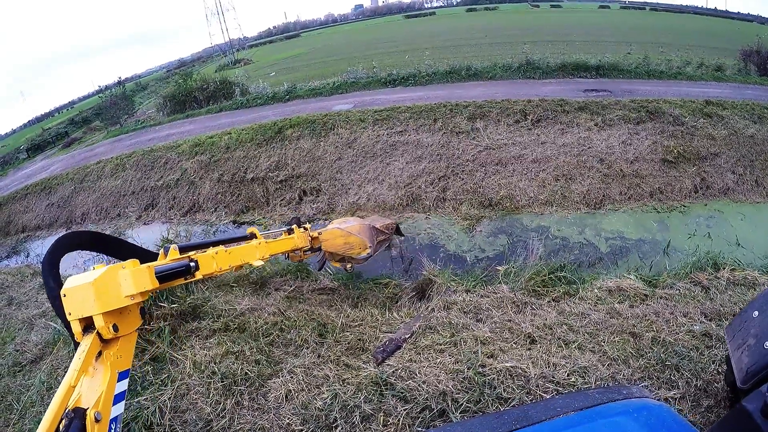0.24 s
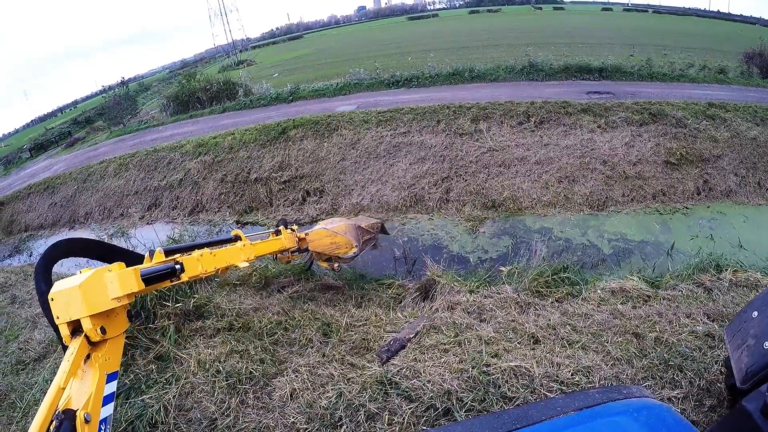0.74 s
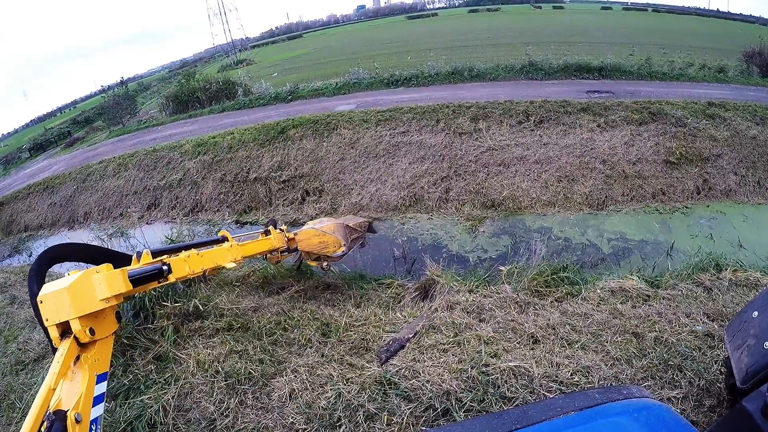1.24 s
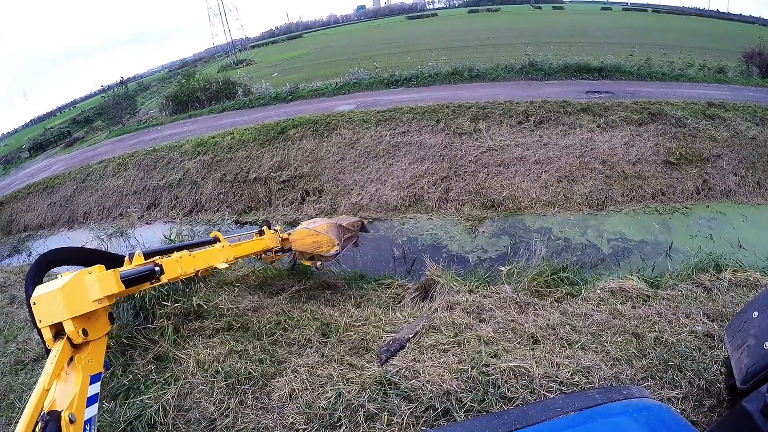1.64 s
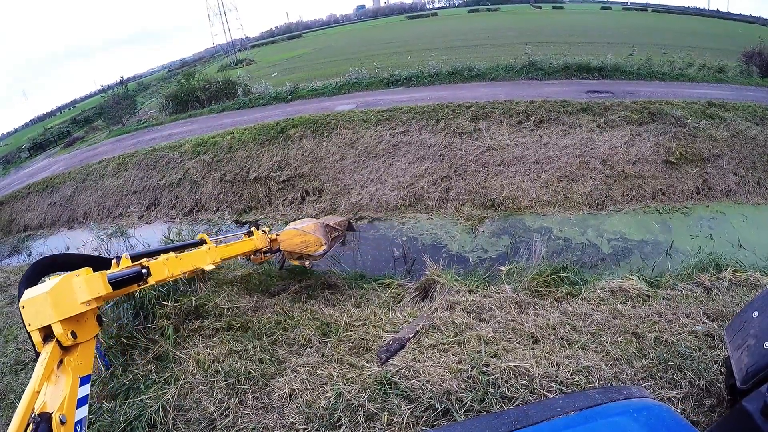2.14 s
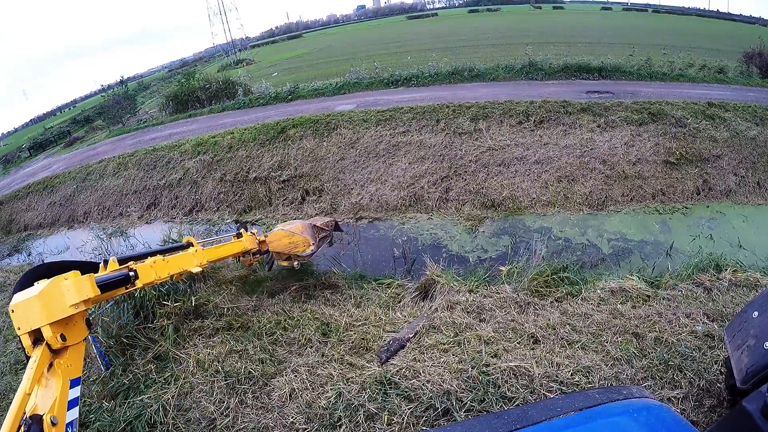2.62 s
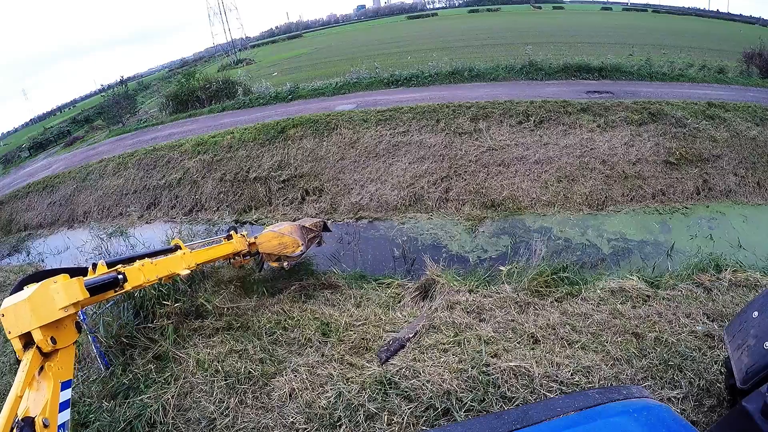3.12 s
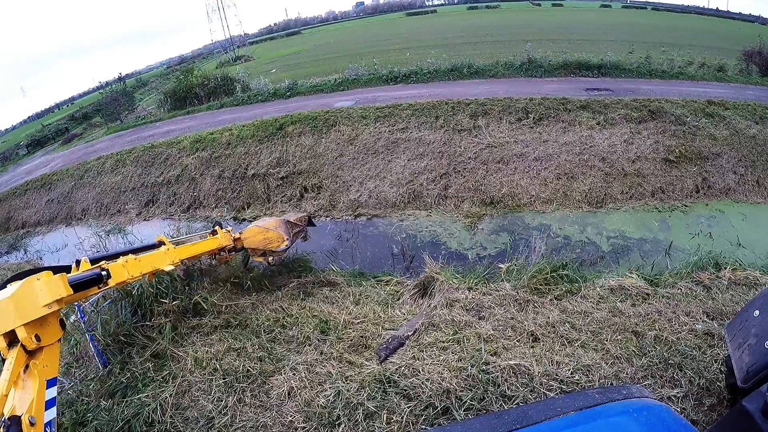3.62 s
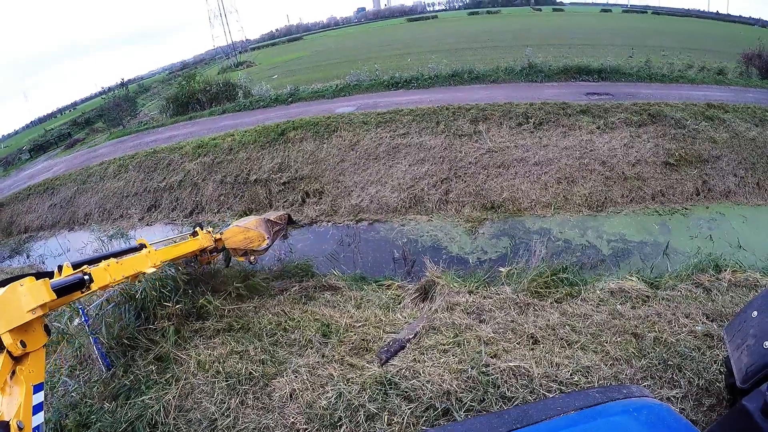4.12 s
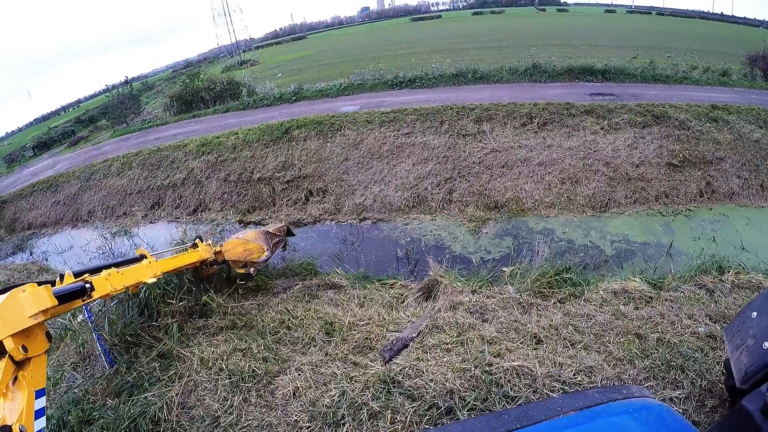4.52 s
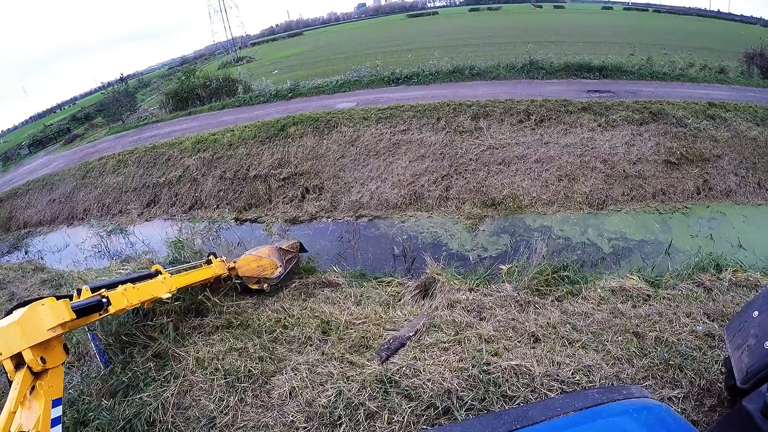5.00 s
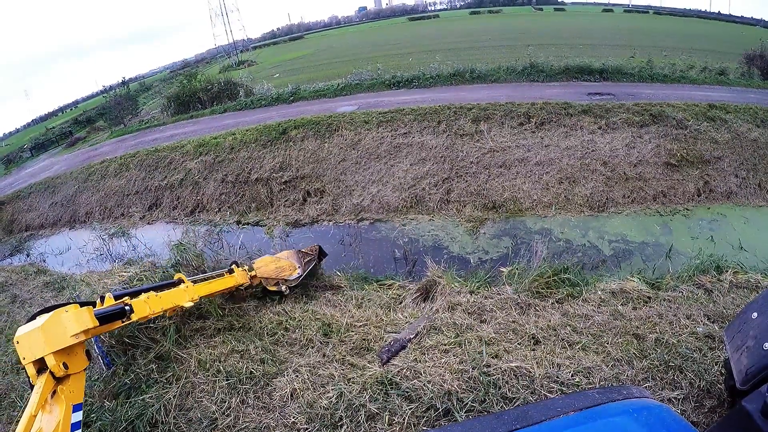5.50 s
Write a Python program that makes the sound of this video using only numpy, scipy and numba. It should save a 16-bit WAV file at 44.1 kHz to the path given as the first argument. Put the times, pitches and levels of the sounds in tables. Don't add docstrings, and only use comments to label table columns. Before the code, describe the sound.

A diesel tractor drones steadily with a deep cab boom and thin whine while flails thrash dry stems, then hiss and splatter through wet growth.

```python
import sys
import numpy as np
from scipy import signal
from scipy.fft import rfft, irfft
from scipy.io import wavfile
from scipy.ndimage import uniform_filter1d
from numba import njit

SR = 44100
rng = np.random.default_rng(int(sys.argv[2]) if len(sys.argv) > 2 else 0)


def level_to_linear(level):
    exponent = np.asarray(level, float) / 20
    return 10 ** exponent


def dump(signal):
    limited = np.clip(np.atleast_2d(signal).T, -1, 1)
    pcm = np.round(limited * 32767).astype(np.int16)
    wavfile.write(sys.argv[1], SR, pcm)


N = 253575


def curve(table):
    s, *columns = np.transpose(table)
    return [np.interp(np.arange(N) / SR, s, c) for c in columns]


def bump(s, span):
    return np.exp(-((np.arange(N) / SR - s) / span) ** 2)


def unit(x):
    return x / np.sqrt(np.mean(x ** 2))


def hiss():
    return rng.standard_normal(N)


@njit
def svf(x, hz, width):
    y, b, l = np.empty(len(x)), 0., 0.
    g, k = np.tan(np.pi * hz / SR), width / hz
    for i in range(len(x)):
        v = (b + g * (x[i] - l)) / (1 + g * (g + k))
        b, l, y[i] = 2 * v - b, l + 2 * g * v, k * v
    return y


def ring(x, hz, width_hz):
    once = svf(x, float(hz), float(width_hz))
    return svf(once, float(hz), float(width_hz))


def walk(rate):
    hold = int(SR / rate)
    steps = np.repeat(rng.standard_normal(N // hold + 1), hold)
    return unit(uniform_filter1d(uniform_filter1d(steps, hold), hold)[:N])


def colour(x, points):
    hz, db = np.transpose(points)
    f = np.maximum(np.arange(len(x) // 2 + 1) * SR / len(x), 1)
    gain = level_to_linear(np.interp(np.log(f), np.log(hz), db))
    return unit(irfft(rfft(x) * gain, len(x)))


def grains(rate, spread_db):
    noise, when, big = hiss(), rng.random(N), rng.exponential(size=N)
    return unit(noise * (when < rate / SR) * level_to_linear(spread_db * big))


def tone(hz):
    return np.sqrt(2) * np.sin(2 * np.pi * (np.cumsum(hz) / SR + rng.random()))


def die_away(t, rise_s, t60_s):
    return np.minimum(t / rise_s, 1) * np.exp(-np.log(1000) * t / t60_s)


def engine_speed():
    return 12.972 * (1 + 0.001023 * walk(3))


# t/s, level/dB
BOOM = [(0, -14.5), (.4, -14), (1, -16.5), (1.55, -15.5), (2.2, -16.5), (3.3, -17), (3.75, -18.5),
        (4.27, -18), (4.9, -16), (5.05, -17.5), (5.4, -18), (5.63, -14.5), (5.75, -19)]
# t/s, boom loss/dB, lasting/s, sway level/dB
JOLTS = [(.13, 2.5, 0.12, -52), (.49, 1, 0.034, -37), (.7, 5, 0.067, -44), (1.0, 1.5, .05, -48),
         (1.69, 4.5, 0.03, -46.5), (2.42, 3.5, 0.036, -42), (2.6, 2.5, 0.028, -55), (3.58, 3.5, 0.036, -42),
         (3.88, 6, 0.077, -39), (4.04, 4, 0.13, -46), (4.36, 5, 0.023, -42), (4.5, 8.5, 0.067, -33),
         (4.7, 4, 0.091, -27), (5.135, 11.5, 0.045, -47), (5.22, 18, 0.031, -42), (5.295, 21, 0.038, -40)]


def boom(speed):
    cycle = 2 * np.pi * np.cumsum(speed) / SR
    swell = 1 + .04 * np.sin(cycle + 1.1)
    hurry = .07 * np.sin(cycle) + .1 * walk(6)
    loss_db = sum(loss * bump(s, span) for s, loss, span, _ in JOLTS)
    level_db = curve(BOOM)[0] - loss_db + 0.74 * walk(24.94)
    return level_to_linear(level_db) * np.sqrt(2) * swell * np.cos(8 * cycle + hurry)


def locked_tone(speed, order, level_db):
    return level_to_linear(level_db + 1.4 * walk(8)) * tone(order * speed * (1 + 0.001597 * walk(20)))


ORDERS = (4, 16, 25, 30, 40, 50, 60, 84, 90, 125, 131.5, 188, 220, 237.5, 250)
ORDERS_DB = (-41, -54, -47, -56, -55.5, -55.5, -56, -59, -61, -55.5, -67, -52, -55.5, -52, -55)


def gears(speed):
    return sum(locked_tone(speed, order, db) for order, db in zip(ORDERS, ORDERS_DB))


PUMP_ORDERS = (95, 100, 120, 150)
# level/dB rms, swell/dB, loudest at t/s, lasting/s
PUMP = [
    (-52.5, 5, 0.96, .8),
    (-52, 6.5, 4.5, 0.49),
    (-51, 4, 2.1, 0.87),
    (-54, 6.5, 4.4, 0.84),
]


def pump(speed):
    out = np.zeros(N)
    for order, (db, swell_db, s, span) in zip(PUMP_ORDERS, PUMP):
        out += locked_tone(speed, order, db + swell_db * bump(s, span) + 0.62 * walk(2))
    return out


# f/Hz, flutter/Hz
BELTS_AND_HOOD = [(269, 4), (467, 4), (572, 2.5), (1830, 22)]
# level/dB rms, gain/dB per s, beat depth/dB, beats per s, strongest at t/s
BELT_AND_HOOD_BEATS = [(-43.5, -0.6, 3.5, .4, 0.47), (-44.5, 0.67, 1, 0.95, 1.6), (-44, -0.2, 0, .55, 2.3),
                       (-49, 0, 3, .7, 0.15)]


def belts_and_hood():
    t = np.arange(N) / SR
    slips_per_s = (0, 0, -.0015, 0)
    out = np.zeros(N)
    for (hz, flutter), (db, gain_db, beat_db, rate, s), slip in zip(BELTS_AND_HOOD, BELT_AND_HOOD_BEATS, slips_per_s):
        level_db = db + gain_db * t + beat_db * np.cos(2 * np.pi * rate * (t - s))
        pitch = hz * (1 + slip * t) + flutter * walk(25)
        out += level_to_linear(level_db - 2.0 + 0.62 * walk(12)) * tone(pitch)
    return out


# f/Hz, width/Hz, level/dB rms
PANELS = [(24, 12, -50), (44, 13, -45), (52.8, 15, -44), (138.2, 23, -45), (224.6, 7.1, -55),
          (273, 18, -52.5), (411.3, 11.5, -51.5), (464, 30, -51), (529.6, 10, -48.5), (567, 27, -59.5),
          (709, 29, -51.5)]


def panels():
    return sum(level_to_linear(db) * unit(ring(hiss(), hz, width)) for hz, width, db in PANELS)


# f/Hz, level/dB per Hz
RUMBLE = [(12, -30), (30, -23), (70, -3), (110, -0.5), (170, -5.5), (260, -3.5), (360, -11), (480, -6.5),
          (620, -9), (800, -15), (1000, -15), (1300, -57)]


def rumble():
    return level_to_linear(-37 + 0.6 * walk(7.8)) * colour(hiss(), RUMBLE)


# t/s, f/Hz
SHAFT = [
    (0, 405.5),
    (.5, 405),
    (1.4, 410),
    (2.6, 408.5),
    (3.5, 408),
    (4.7, 406),
    (5.75, 407),
]
WHINE_ORDERS = (1, 16, 16, 17, 17, 19)
# level/dB, loudest at t/s, lasting/s
WHINES = [(-49, 6, 4), (-62, .9, .9), (-66, 3.2, 1.2), (-67, 0.71, .5), (-67, 3.4, 1.3), (-68, 3.5, 1.3)]


def turbo(wet_db):
    steady = curve(SHAFT)[0]
    shaft = steady + .5 * walk(40)
    whistle_db = -61.5 - .5 * (steady - steady.mean()) + 0.19 * (wet_db - wet_db.min())
    out = level_to_linear(whistle_db + 2.6 * walk(25.18)) * tone(18 * shaft)
    for order, (db, s, span) in zip(WHINE_ORDERS, WHINES):
        out += level_to_linear(db + 1.0 * walk(12)) * bump(s, span) * tone(order * shaft)
    return out


# f/Hz, level/dB per Hz
HEAD = [(500, -68.5), (800, -64), (1150, -58.5), (1270, -55.5), (1400, -62), (1520, -58.5), (1600, -56),
        (1850, -53.5), (1960, -53), (2010, -65.5), (2150, -61), (2450, -56), (2850, -53), (3150, -58),
        (3350, -65.5), (3750, -64), (3950, -59), (4100, -63), (4180, -65.5), (4400, -63.5),
             (4900, -68.5), (5350, -72.5), (5700, -71.5), (6100, -75), (7700, -75), (7900, -81.5),
             (11000, -86), (15500, -91)]
# extra level/dB, at t/s, lasting/s
TUFT = (2.3, 0.3, .06)


def flails():
    shared_db = .5 * walk(14) + 0.53 * walk(45)
    knocks = np.zeros(N)
    for hz in 700 * 2 ** np.arange(0, 4.6, .75):
        flicker_db = 0.55 * walk(5.92) + shared_db * min(hz / 4000, 1.5)
        knocks += level_to_linear(flicker_db) * svf(grains(12000, 1.5), hz, hz / 1.37) / np.sqrt(hz)
    spectrum = rfft(knocks)
    flat = uniform_filter1d(np.abs(spectrum) ** 2, size=4001) ** -.5
    extra_db, s, span = TUFT
    level_db = -36.5 + extra_db * bump(s, span)
    return level_to_linear(level_db + 1.5) * colour(irfft(spectrum * flat, N), HEAD)


# t/s, spray level/dB
WETNESS = [
    (0, -54.5),
    (.5, -61),
    (1.5, -62.5),
    (4.38, -66),
    (4.47, -55),
    (4.63, -52.5),
    (5.0, -50.5),
    (5.41, -50),
    (5.75, -46),
]


def wetness():
    return curve(WETNESS)[0]


# f/Hz, level/dB per Hz
WET = [(1470, -36), (2500, -5.5), (3090, 0), (3610, -21), (4010, -8), (5420, -14.5), (7430, -12.5),
       (8070, -21.5), (9520, -19), (15000, -28)]


def spray(wet_db):
    fade = np.exp(-1 / (.004 * SR))
    spatter = signal.lfilter([1], [1, -fade], np.abs(grains(160, 1.2)))
    drops = colour(grains(9000, 1.0), WET) * (1 + 0.34 * unit(spatter))
    return level_to_linear(wet_db + 10.5) * unit(drops)


def buffet():
    sway = tone(20.5 + 1.2 * walk(6)) + .45 * unit(ring(hiss(), 27, 26))
    strength = level_to_linear(-48) + sum(level_to_linear(db) * bump(s, 1.7 * span) for s, _, span, db in JOLTS)
    return strength * level_to_linear(1.5 * walk(8)) * sway


# t/s, peak level/dB, brightness/dB
STEM_SLAPS = [(0.2369, -30.5, -12), (0.484, -30, -10), (2.3895, -41, -24), (4.4573, -29, -11),
              (4.505, -38, -16), (4.5351, -35, -6), (4.596, -33.5, -19), (4.62, -31.5, -7),
              (4.6674, -34, -5), (4.6794, -36, -9), (4.737, -33, -5), (4.8173, -39, -12),
              (4.8345, -25.5, -11), (4.879, -31, -17), (4.973, -34, -12), (5.1206, -34, -20),
              (5.169, -24, -18), (5.184, -28, -14), (5.1956, -27, -13), (5.407, -30, -10),
              (5.437, -27, -22), (5.5057, -34, -22), (5.5456, -31, -17), (5.5677, -32, -17),
              (5.638, -29, -14), (5.7094, -36, -16.5)]
# t/s, peak level/dB
WATER_SLAPS = [(0.4774, -32), (4.4174, -39), (4.4365, -26.5), (4.561, -35), (4.6523, -31.5), (4.715, -34),
               (4.7815, -27), (4.9141, -39), (5.1091, -32), (5.255, -35), (5.295, -35), (5.601, -28),
               (5.68, -41)]


def slaps():
    out = np.zeros(N + SR)
    t = np.arange(SR // 5) / SR
    stems = [(s, db, bright_db, 4700) for s, db, bright_db in STEM_SLAPS]
    water = [(s, db, -23, 7150) for s, db in WATER_SLAPS]
    for s, db, bright_db, hz in stems + water:
        t60_s = .055 + .001 * (db + 32.5)
        noise = rng.standard_normal((2, len(t)))
        body = unit(svf(noise[0], float(hz), 1040.0)) + 0.79 * unit(ring(noise[0], 5300, 4300))
        top = level_to_linear(bright_db + 6.5) * unit(svf(noise[1], 10000.0, 5500.0))
        start = int(s * SR)
        out[start:start + len(t)] += level_to_linear(db - 10.0) * die_away(t, 0.0026, t60_s) * (body + top)
    return out[:N]


# t/s, level/dB, t60/s, then three ringing f/Hz
CLANKS = [
    (.365, -40, .22, 1010, 1090, 930),
    (.4755, -44, .05, 7750, 11800, 10000),
    (5.168, -35, .08, 4050, 7200, 5150),
    (5.706, -38, .07, 4100, 5000, 3000),
]


def clanks():
    out = np.zeros(N + SR)
    t = np.arange(SR // 5) / SR
    for s, db, t60_s, *modes_hz in CLANKS:
        strike = np.zeros(len(t))
        for k, hz in enumerate(modes_hz):
            strike += level_to_linear(-6 * k) * np.sin(2 * np.pi * (hz * t + rng.random()))
        start = int(s * SR)
        out[start:start + len(t)] += level_to_linear(db + 5.5) * die_away(t, 0.0012, t60_s) * strike
    return out[:N]


def scene():
    speed = engine_speed()
    wet_db = wetness()
    engine = boom(speed) + gears(speed) + pump(speed) + belts_and_hood() + panels() + rumble()
    head = flails() + spray(wet_db) + slaps() + clanks()
    return (engine + turbo(wet_db) + head + buffet())[None]


def top_cut(x):
    return signal.sosfilt(signal.butter(12, 15310, fs=SR, output="sos"), x)


def record(dry):
    return top_cut(dry)


dry = scene()
out = record(dry)
dump(out)
```